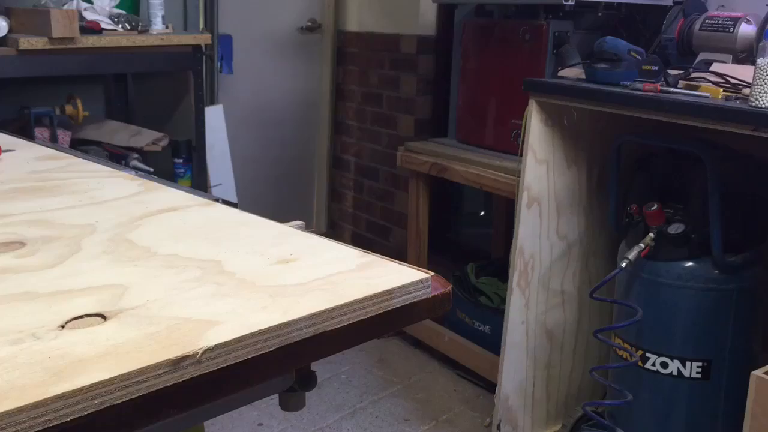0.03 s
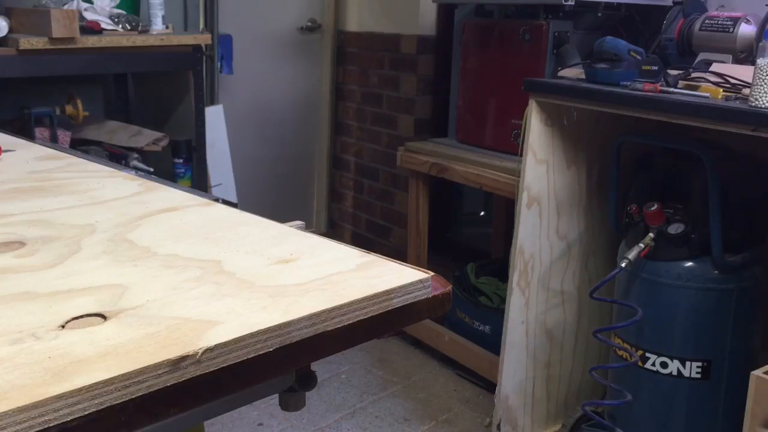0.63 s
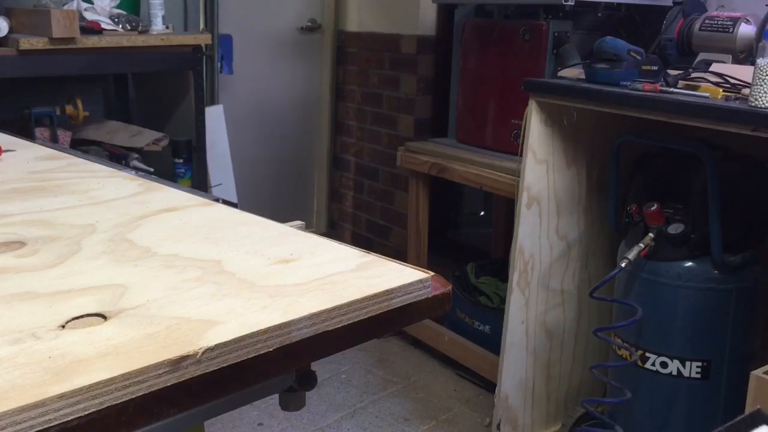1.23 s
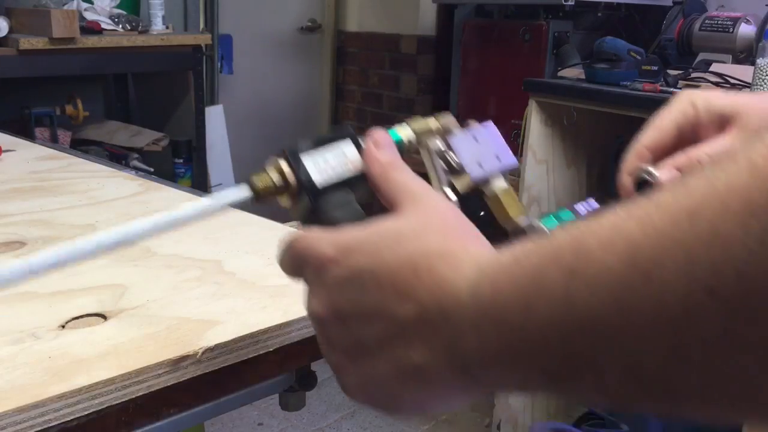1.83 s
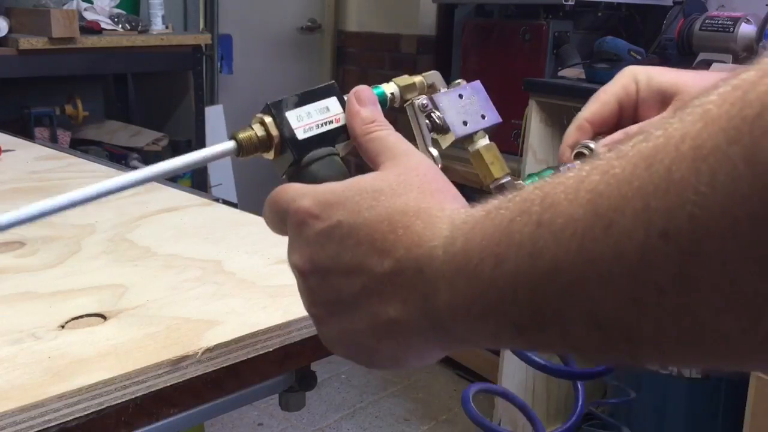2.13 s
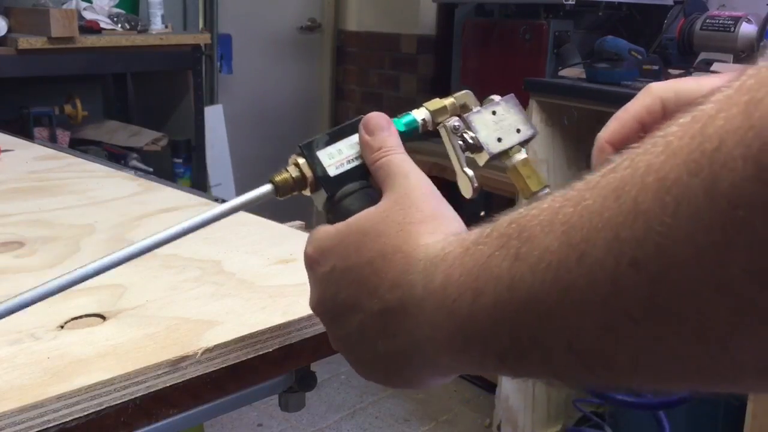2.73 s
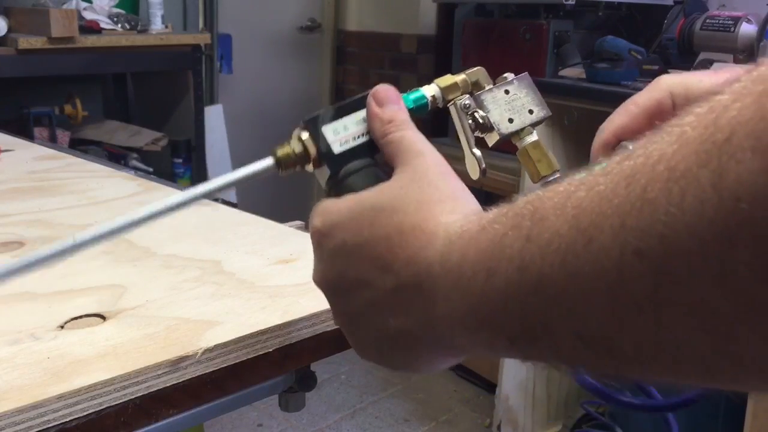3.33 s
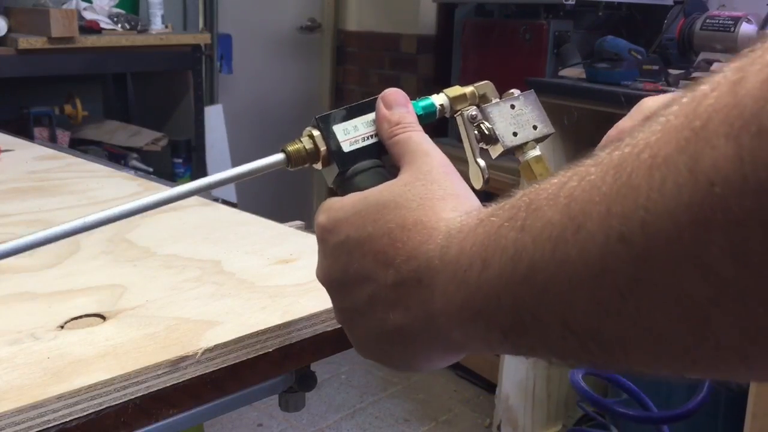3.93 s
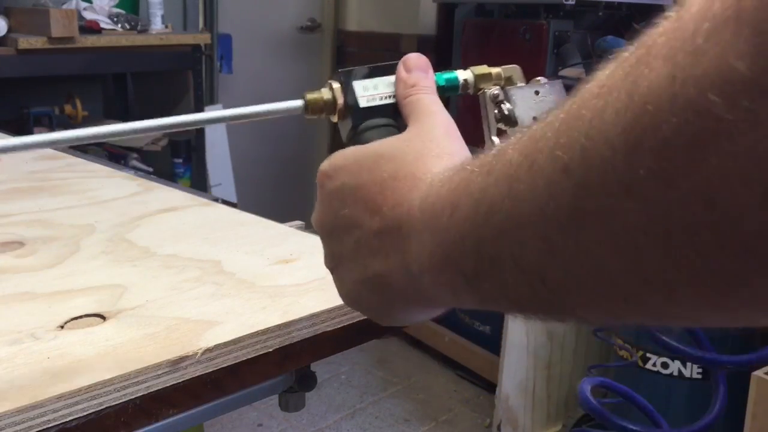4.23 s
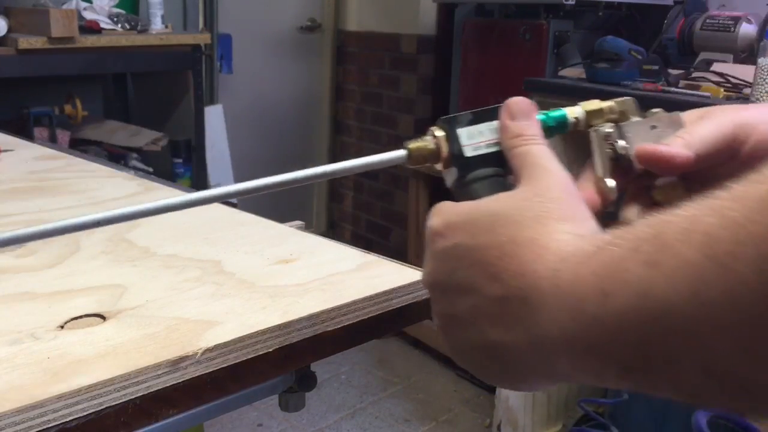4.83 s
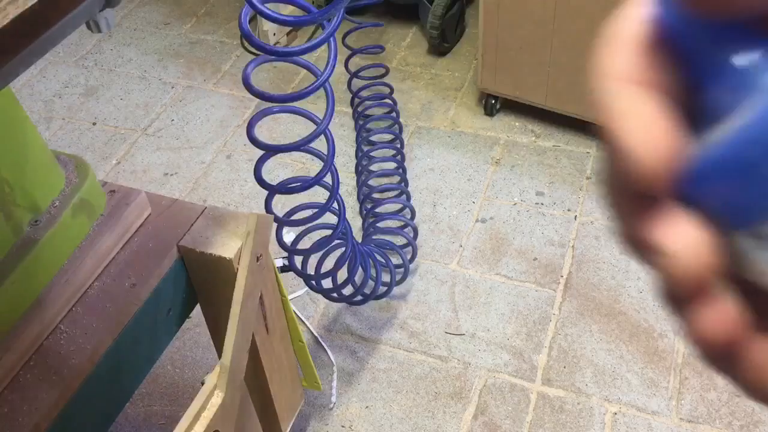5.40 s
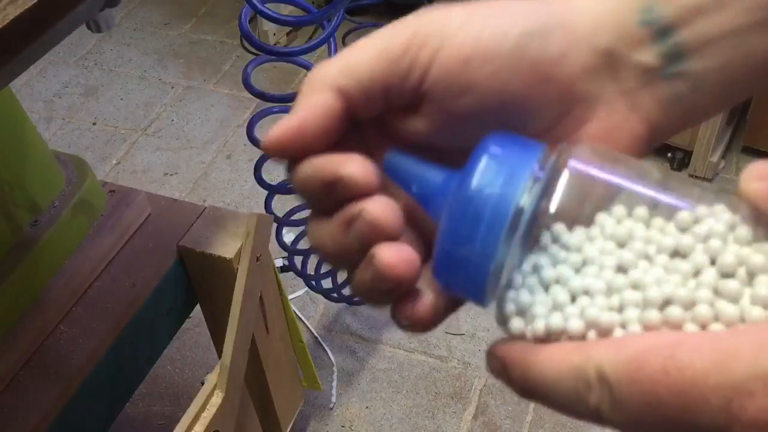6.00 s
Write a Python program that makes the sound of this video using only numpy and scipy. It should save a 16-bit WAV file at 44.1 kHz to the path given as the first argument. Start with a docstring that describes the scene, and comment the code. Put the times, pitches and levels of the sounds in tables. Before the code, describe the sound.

Light clunks and metal clicks lead to a sharp burst of compressed air with ringing metal, followed by pellets rattling in a plastic bottle.

```python
"""Air gun and pellet bottle

An air gun is handled in a small workshop: its hollow body knocks, its brass fittings click, then the hose
coupling lets go with a short blast of compressed air and a clack, and nearby metal rings on. Close by, a
plastic bottle of pellets is picked up and tilted, so that the pellets slide and knock against its wall.
Under it all lie a low rumble, a hum and the hiss of the room."""
import sys
import numpy as np
from scipy import signal
from scipy.fft import rfft, irfft
from scipy.io import wavfile
from scipy.ndimage import uniform_filter1d

SR = 44100
rng = np.random.default_rng(int(sys.argv[2]) if len(sys.argv) > 2 else 0)


def to_wav(s):
    """Save 16-bit WAV."""
    ch = np.atleast_2d(s).T  # columns
    pcm = np.round(np.clip(ch, -1, 1) * 32767)  # PCM
    wavfile.write(sys.argv[1], SR, pcm.astype(np.int16))


N = 271656
TIME = np.arange(N) / SR

# Envelope of the air leaving the coupling: time_s, jet_db, roar_db
BLAST_ENVELOPE = [(3.89, -85.5, -82), (3.91, -51.5, -59.5), (3.933, -24.5, -31), (3.96, -21, -30.5),
                  (3.995, -15, -24), (4.015, -17.5, -27), (4.05, -30, -36), (4.1, -45, -58.5)]
# Tone of the thin jet and of the emptying hose's roar: freq_hz, gain_db
JET_EQ = [(5000, -41.5), (7400, -22.5), (8100, -6), (8700, -8), (9700, -2), (10400, -9.5), (11500, -4),
          (12700, -1), (15300, -4)]
ROAR_EQ = [(40, -14.5), (100, -17), (240, -4.5), (380, -5.5), (500, -8), (880, -2), (1300, -4.5), (2200, 5),
           (2900, -1), (4800, 0.5), (7000, -3), (10000, -20.5)]
# Early reflections off nearby surfaces: delay_ms, gain_db
ECHOES = [(1.7, -18), (4.3, -17), (7.1, -17.5), (11.9, -14.5), (14.6, -16.5)]
def air_blast():
    """Turbulent air escapes as the coupling opens; close echoes comb it."""
    jet = gain_of(-2) * noise(JET_EQ) * envelope(BLAST_ENVELOPE, column=1)
    roar = gain_of(-3) * noise(ROAR_EQ) * envelope(BLAST_ENVELOPE, column=2)
    air = (jet + roar) * flutter(depth_db=1.13, samples=200)
    out = air.copy()
    for delay_ms, db in ECHOES:
        add(out, delay_ms / 1000, gain_of(db) * air)
    return out


# Tone of the shaken tools and shelves: freq_hz, gain_db
SHIMMER_EQ = [(900, -25), (1900, -8), (2900, -2.5), (3700, -2.5), (4500, -3), (5200, -4.5), (5900, -1),
              (7000, -5.5), (8200, -11.5), (12000, -23)]
# Steel parts that sing on: pitch_hz, level_db, t60_s
STEEL_MODES = [(1970, -19.5, 1.5), (2230, -12, .8), (2460, -10, 0.88), (2756, -12, .75), (2810, -4.5, .75),
               (3047, -12.5, 0.33), (4250, -0.5, .5), (4600, -3, 0.76), (4560, -2.5, .55),
               (5700, -10.5, .45)]
def ringing_metal(shimmer_t60_s=0.62):
    """At its peak the blast sets nearby metal ringing: a few clear modes in a dense shimmer."""
    out, t = np.zeros(N), np.arange(SR) / SR
    shimmer = noise(SHIMMER_EQ)[:SR] * gain_of(-39 - 60 * t / shimmer_t60_s)
    peak_s = max(BLAST_ENVELOPE, key=lambda row: row[1])[0]
    add(out, peak_s, shimmer + gain_of(-48) * ringing(STEEL_MODES, t))
    return out


# Collar, latch and plug: start_s, level_db, brightness_db, pitch_hz, extra_bass_db, decay_factor
COUPLING_CLICKS = [(2.1973, -55, -11, 5600, 2, 4.7), (2.5497, -53.5, 3, 7440, 7, 2.6),
                   (2.5538, -54.5, 4, 4400, 4, 3.1), (2.7115, -43, -4, 2370, -7, 5),
                   (2.7158, -31, 1, 8100, -4.5, 1.7), (2.7184, -37, 0.5, 4340, 1.5, 2),
                   (3.4575, -47.5, 2, 2350, 11, 1.8), (3.4595, -43, -3, 6430, 15, 1.4),
                   (3.4942, -50.5, -4, 3580, 8, .8), (3.5161, -37.5, 12.5, 11800, 14, 0.44),
                   (3.5206, -47, -10, 2550, -6, .7), (3.7006, -44.5, -6.5, 2540, -16, 2.6),
                   (3.7054, -52, -7, 2720, 4, 1.1), (4.1043, -27, 0.5, 4250, -3, 2.2),
                   (4.117, -42, 10.5, 3120, 8, 0.87)]
# Attack of a hit on brass: bass_db, treble_db, top_db, base_decay_ms
BRASS_ATTACK = (-0.5, -0.5, -6, 0.62)
# Ring of the brass: pitch_hz, level_db, t60_s
BRASS_MODES = [(2120, 0, 0.1), (2170, -15, 0.1), (2480, 4.5, .11), (2480, -2.5, 0.12), (2823, -7, 0.076),
               (4270, 3, 0.1), (5300, -3, 0.12), (7160, -6, 0.066), (8800, 6, .06), (12500, 7, 0.086),
               (14390, -10, .05)]
# Small fittings radiate little bass: freq_hz, gain_db
BRASS_EQ = [(300, -3), (800, -5.5), (1300, -7), (2100, 2), (3200, 0.5), (8000, -1.5), (11000, -2.5),
            (15000, 4)]
def hose_coupling():
    """The coupling's parts snap against each other and ring the brass."""
    clicks = strikes(COUPLING_CLICKS, BRASS_ATTACK, BRASS_MODES, ring_db=-13, deep_db=-19, tick_db=-2)
    return gain_of(-1.5) * coloured(clicks, BRASS_EQ)


# Knocks on the gun: start_s, level_db, brightness_db, pitch_hz
GUN_KNOCKS = [(0.6967, -62.5, 2, 1430), (0.7742, -49.5, -7, 3600), (0.8154, -55, -7, 3820),
              (0.8442, -55, -2, 4300), (0.8522, -43, -3, 4520), (0.8863, -47, 1, 2140),
              (0.8956, -38.5, 5, 6100), (0.9035, -36.5, 12, 6500), (0.9217, -44.5, -7, 3370),
              (0.93, -35, 16, 7100), (0.9345, -39, -9, 2110), (1.4167, -52, -12, 1630),
              (1.4694, -48, -25, 3370), (1.712, -58.5, 6, 5270)]
# Attack of a hit on the gun: bass_db, treble_db, top_db, base_decay_ms
GUN_ATTACK = (-5.5, -7, -15, 3)
# Hollow ring of its body: pitch_hz, level_db, t60_s
GUN_MODES = [(724, -8.5, 0.077), (1028, 0, 0.064), (1141, 7, 0.1), (1580, -9, 0.034), (2050, 0, 0.082),
             (2140, -3, 0.22), (2500, -3, 0.092), (3370, 13, 0.018), (4130, 2.5, 0.066), (6800, -20, 0.067),
             (8000, -21, .12)]
def gun_knocks():
    """The gun's hollow body knocks and rings as it is lifted."""
    return gain_of(-2) * strikes(GUN_KNOCKS, GUN_ATTACK, GUN_MODES, ring_db=-7.5, deep_db=-30, tick_db=-4)


# Envelope of the drag: time_s, level_db
DRAG_ENVELOPE = [(.74, -79), (.78, -59), (.81, -75), (.84, -53), (.88, -59), (.93, -65.5), (.97, -65),
                 (1.03, -84)]
# Tone of the scrape: freq_hz, gain_db
SCRAPE_EQ = [(400, -40), (1000, -1), (3000, -5), (4400, -1.5), (5200, -17), (8000, -5), (10500, -25),
             (14000, -9)]
def gun_drag():
    """As the gun is picked up, small slips scrape it and sound its hollow body."""
    slips = flutter(depth_db=3, samples=50)
    scrape = unit_rms(noise(SCRAPE_EQ) * slips)
    ring = ringing(GUN_MODES, np.arange(SR // 8) / SR)
    body = unit_rms(signal.oaconvolve(scrape, ring)[:N])
    return gain_of(-2.5) * unit_rms(scrape + gain_of(-7) * body) * envelope(DRAG_ENVELOPE)


# Hits on the bottle wall: start_s, level_db, brightness_db, pitch_hz
PELLET_KNOCKS = [(5.2036, -63, -5, 2910), (5.291, -46, 0, 1260), (5.296, -52, 8, 3270),
                 (5.3273, -56, 5, 3640), (5.3322, -48, -23, 3600), (5.3432, -48.5, -13, 2900),
                 (5.3809, -39, -22, 2720), (5.3877, -41, -15.5, 3120), (5.3906, -35.5, -4, 3040),
                 (5.4826, -33.5, 4, 3870), (5.491, -34, -9, 4020), (5.5042, -35.5, 2, 4100),
                 (5.516, -36, -5, 3190), (5.5217, -35.5, 0, 4500), (5.6514, -31, 12, 6740),
                 (5.6602, -33.5, 3, 5560), (5.6745, -34, 5, 3680), (5.6788, -30.5, -24, 3370),
                 (5.7219, -33.5, -7, 3470), (5.732, -36, 15, 7300), (5.743, -34.5, -3, 3600),
                 (5.7834, -31, -7, 3900), (5.8193, -39.5, 3, 3500), (5.8594, -38, -2, 2230),
                 (5.8912, -30.5, 10, 2140), (5.9056, -52, 1, 1890), (5.925, -48, -9, 1870),
                 (5.9367, -55, 7, 5590), (6.0602, -53, -4, 5640), (6.0787, -56, 3, 6090),
                 (6.0918, -54, -11, 2320), (6.1101, -44, -7, 4320), (6.1196, -45.5, 7, 6750),
                 (6.1487, -41, 2.5, 1940)]
# Attack of a pellet: bass_db, treble_db, top_db, base_decay_ms
PELLET_ATTACK = (-17, 2, -13, 2.1)
# Short ring of the plastic: pitch_hz, level_db, t60_s
BOTTLE_MODES = [(1000, -16, 0.059), (2100, -0.5, 0.011), (2240, 5, 0.013), (3000, 7.5, 0.011),
                (3080, 2, 0.011), (3504, 5, 0.023), (3730, -2.5, 0.018), (4300, -13, 0.031),
                (6170, 4.5, 0.01), (6840, 2, 0.0078)]
def pellet_knocks():
    """Single pellets strike the wall and ring the bottle."""
    knocks = strikes(PELLET_KNOCKS, PELLET_ATTACK, BOTTLE_MODES, ring_db=-10, deep_db=-59, tick_db=-2)
    return gain_of(-0.5) * knocks


# The heap shifts, pours, settles and starts back: time_s, level_db
SLIDE_ENVELOPE = [(5.275, -71.5), (5.298, -52.5), (5.355, -54), (5.39, -53), (5.45, -53.5), (5.57, -39),
                  (5.625, -42.5), (5.67, -39.5), (5.77, -40.5), (5.87, -57), (5.95, -71), (6.0, -59.5),
                  (6.06, -69.5), (6.135, -50), (6.16, -56)]
# Tone of the pellets in their bottle: freq_hz, gain_db
PELLET_EQ = [(180, -82), (300, -46.5), (756, -41), (922, -12.5), (1370, -4), (2170, -4.5), (2480, -8),
             (3570, -4), (4280, -2.5), (6900, -7), (10600, -15), (14300, -12.5), (15500, -23)]
def pellet_slide(tick_decay_s=0.00036, spots=24):
    """Pellets collide more often the faster they slide; each tick also rings the bottle."""
    out, t = np.zeros(N), np.arange(SR // 30) / SR
    start_s = SLIDE_ENVELOPE[0][0]
    slide = envelope(SLIDE_ENVELOPE)[round(start_s * SR):]
    hits_per_s = 450 + 1400 * slide / slide.max()
    collides = rng.random(N)[-len(slide):] < hits_per_s / SR
    hardness = rng.exponential(1, N)[-len(slide):]  # many small collisions, a few hard ones
    spot = rng.integers(0, spots, N)[-len(slide):]  # each place in the bottle has its own tick
    strength = unit_rms(gain_of(1.5 * np.minimum(hardness, 3)))
    hits = strength * collides * np.sqrt(SR / hits_per_s) * slide
    for k in range(spots):
        burst = rng.standard_normal(len(t)) * np.exp(-t / tick_decay_s)
        tick = unit_energy(coloured(burst, PELLET_EQ))
        wall = gain_of(-2) * unit_energy(ringing(BOTTLE_MODES, t))
        add(out, start_s, signal.fftconvolve(hits * (spot == k), unit_energy(tick + wall)))
    return out


# The hand damps the bottle's low ring: freq_hz, gain_db
GRIP_EQ = [(300, -11), (900, -5.5), (1500, -5.5), (2600, 2.5), (3500, 0), (6000, 1.5), (14000, 0.5)]
# The small bottle radiates little bass: freq_hz, gain_db
BOTTLE_EQ = [(250, -16.5), (600, -12.5), (900, -1.5), (1400, 0), (9000, 0), (15000, -3.5)]
def held_bottle(pellets, loosen_at_s=5.49, loosen_over_s=0.18):
    """The bottle sounds thin while it is gripped and fills out as the hand loosens."""
    loose = np.clip((TIME - loosen_at_s) / loosen_over_s, 0, 1)
    gripped = coloured(pellets, GRIP_EQ)
    return coloured(loose * pellets + (1 - loose) * gripped, BOTTLE_EQ)


# Strokes of the hand: start_s, length_s, level_db, centre_hz, width_hz
RUBS = [(1.055, 0.083, -66.5, 3110, 200), (1.06, 0.058, -72, 610, 300), (1.465, 0.027, -66, 3300, 1280),
        (2.1, 0.24, -68, 3120, 265), (2.17, 0.11, -70.5, 4540, 2500), (2.555, 0.074, -66, 2050, 700),
        (2.95, 0.086, -82, 1390, 1200), (3.705, 0.075, -70, 2940, 1090), (5.17, 0.1, -74.5, 2100, 1178)]
def hand_rubs():
    """Hands rub on hose and fittings with a grainy friction."""
    return swishes(RUBS, grain_db=2.5)


# Wisps of air: start_s, length_s, level_db, centre_hz, width_hz
WISPS = [(1.215, 0.078, -75, 12100, 2200), (2.19, 0.05, -70, 13000, 3000), (2.54, 0.04, -65, 13700, 2960),
         (3.517, 0.062, -60, 12100, 1100)]
def air_leaks():
    """Air leaks at the coupling in smooth, high wisps."""
    return swishes(WISPS, grain_db=1)


# Low thuds: start_s, level_db, pitch_hz
BUMPS = [(0.437, -57, 197), (0.525, -51, 164), (0.578, -52, 228), (1.079, -58, 227), (1.089, -56, 73.5),
         (2.157, -45.5, 125), (2.217, -48.5, 113), (2.299, -53.5, 317), (2.428, -55, 329),
         (2.599, -51.5, 101), (4.42, -48.5, 65), (4.5, -50.5, 64.8), (5.295, -49.5, 153)]
def handling_bumps(rise_s=0.013):
    """Handling makes dull, soft-edged bumps that swell and fade."""
    out, t = np.zeros(N), np.arange(SR // 4) / SR
    swell = t / rise_s * np.exp(1 - t / rise_s)
    for start_s, db, hz in BUMPS:
        add(out, start_s, gain_of(db - 5) * swell * np.sin(2 * np.pi * (hz * t + rng.random())))
    return out


# Decay of the room: freq_hz, t60_s
ROOM_DECAY = [(150, 0.054), (700, 0.38), (2500, 0.26), (5000, 0.26), (9000, 0.24), (14000, 0.063)]
def workshop_reverb(send, predelay_s=0.003, density=1 / 6):
    """Dense reflections from bench, floor and shelves; each band dies at its own speed."""
    size = SR * 3 // 4
    reflections = rng.standard_normal(size) * (rng.random(size) < density)
    reflections *= np.arange(size) / SR > predelay_s
    hz, t, bands = signal.stft(reflections, SR, nperseg=256)
    decay = gain_of(-60 * t / value_at(ROOM_DECAY, hz)[:, None])
    tail = signal.istft(bands * decay, SR, nperseg=256)[1]
    return signal.oaconvolve(send, unit_energy(tail))[:N]


# Envelope of the rumble's two layers: time_s, deep_db, upper_db
RUMBLE_ENVELOPE = [(0.08, -76, -64), (0.11, -71, -66.5), (0.69, -67, -66), (0.86, -73, -73.5),
                   (1.97, -69, -70), (2.23, -65, -61.5), (2.64, -66.5, -68.5), (3.36, -74.5, -72),
                   (3.87, -69, -72), (3.94, -75, -64), (4.02, -56.5, -46.5), (4.14, -78, -76.5),
                   (4.53, -70, -70), (4.7, -72, -70.5), (4.92, -67.5, -73.5), (5.18, -62, -72),
                   (5.65, -70, -74.5), (6.16, -67, -68.5)]
# Tone of each layer: freq_hz, gain_db
DEEP_EQ = [(20, -28.5), (40, -13), (62, 5.5), (80, 5), (105, -10.5), (200, -41.5)]
UPPER_EQ = [(59, -28.5), (100, -5), (123, -3), (184, -4), (216, -1), (259, -11.5), (324, -6.5),
            (416, -24.5), (578, -29.5), (600, -33.5), (780, -63.5), (1320, -120)]
def rumble():
    """A low rumble rises and sinks with the handling and surges with the air blast."""
    deep = gain_of(-1) * noise(DEEP_EQ) * envelope(RUMBLE_ENVELOPE, column=1)
    upper = gain_of(-1.5) * noise(UPPER_EQ) * envelope(RUMBLE_ENVELOPE, column=2)
    return deep + upper


# Envelope of the hum: time_s, level_db
HUM_ENVELOPE = [(4.9, -68), (5.13, -59.5), (5.28, -55.5), (5.5, -61.5), (6.16, -60.5)]
def hum(pitch_hz=63.5, waver_hz=1.23):
    """A wavering hum near the bottle swells, then settles."""
    hz = pitch_hz + waver_hz * wander(samples=8000)
    swell = gain_of(-1) * envelope(HUM_ENVELOPE) * flutter(depth_db=1, samples=7000)
    return swell * unit_rms(np.sin(2 * np.pi * np.cumsum(hz) / SR))


# Tone of the room's hiss: freq_hz, gain_db
HISS_EQ = [(240, -29), (400, -2), (419, -6), (633, -7.5), (715, -7.5), (1690, -10.5), (1910, -10),
           (2090, -9.5), (3910, -13), (15500, -23)]
def room_hiss():
    """A faint, steady hiss fills the room."""
    return gain_of(-78.5) * noise(HISS_EQ)


# Centres of a contact's bass, mids, treble and top: freq_hz
BANDS_HZ = [1050, 2700, 6600, 12200]
def impact(attack, deep_db, tick_db, level_db, bright_db, pitch_hz, extra_bass_db=0, decay_factor=1):
    """A hard contact: a noisy crack and a pitched tick that die within milliseconds."""
    bass, treble, top, base_decay_ms = attack  # band gains are relative to the mids
    bass, treble, top = bass + extra_bass_db, treble + 0.77 * bright_db, top + bright_db
    # Harder contacts are shorter: the decay time halves for every 26 dB above a medium hit.
    decay_ms = base_decay_ms * decay_factor * 2 ** ((-45 - level_db) / 26)
    t = np.arange(SR // 9) / SR
    fade = np.exp(-t * 1000 / max(decay_ms, 0.1))
    eq = [(200, bass + deep_db), (600, bass - 10), *zip(BANDS_HZ, [bass, 0, treble, top]),
          (17000, top - 7)]
    crack = unit_energy(coloured(rng.standard_normal(len(t)) * fade, eq))
    tick = gain_of(tick_db) * unit_energy(np.sin(2 * np.pi * pitch_hz * t) * fade)
    return gain_of(level_db) * unit_energy(crack + tick) * np.sqrt(0.0034 * SR)  # rms over 3.4 ms


def strikes(rows, attack, modes, ring_db, deep_db, tick_db):
    """Each contact also sets the modes of the struck object ringing."""
    out, t = np.zeros(N), np.arange(SR // 4) / SR
    for start_s, *blow in rows:
        contact = impact(attack, deep_db, tick_db, *blow)
        ring = gain_of(ring_db) * np.linalg.norm(contact) * unit_energy(ringing(modes, t))
        add(out, start_s, contact)
        add(out, start_s, ring)
    return out


def ringing(modes, t):
    """Sum of dying modes, each struck with its own random strength."""
    hz, db, t60 = np.transpose(modes)[:, :, None]
    strength = rng.uniform(0.7, 1.3, hz.shape) * rng.choice([-1, 1], hz.shape)
    return (strength * gain_of(db - 60 * t / t60) * np.sin(2 * np.pi * hz * t)).sum(0)


def swishes(rows, grain_db):
    """Short swells of grainy noise in one resonance: quick to rise, slower to fade."""
    out = np.zeros(N)
    for start_s, length_s, db, centre_hz, width_hz in rows:
        size = max(round(length_s * SR), 200)
        grains = gain_of(grain_db * wander(samples=70, length=size)) * rng.standard_normal(size)
        detune = (np.fft.rfftfreq(size, 1 / SR) - centre_hz) / (width_hz / 2)
        band = irfft(rfft(grains) / (1 + detune ** 2) ** 0.63, size)
        swell = np.sin(np.pi * np.sqrt(np.linspace(0, 1, size)))
        add(out, start_s, gain_of(db) * unit_rms(band) * swell)
    return out


def coloured(x, eq):
    """Causal filter with the given spectrum, so attacks stay sharp."""
    log_gain = np.log(gain_of(value_at(eq, abs(np.fft.fftfreq(2048, 1 / SR)))))
    minimum_phase = np.exp(np.conj(signal.hilbert(log_gain)))
    taps = np.fft.ifft(minimum_phase).real
    return signal.fftconvolve(x, taps[:len(taps) // 2])[:len(x)]


def noise(eq):
    """Steady noise of rms 1 with the given spectrum."""
    return unit_rms(coloured(rng.standard_normal(N), eq))


def wander(samples, length=N):
    """Random drift of rms 1, smoothed over the given samples."""
    return unit_rms(uniform_filter1d(rng.standard_normal(length), samples))


def flutter(depth_db, samples):
    """A gain that swells and sinks at random."""
    return gain_of(depth_db * wander(samples))


def envelope(rows, column=1):
    """Amplitude over time from one dB column of a curve; silent outside it."""
    rows = np.asarray(rows)
    return gain_of(np.interp(TIME, rows[:, 0], rows[:, column], left=-140, right=-140))


def value_at(curve, hz):
    """Reads a curve on a log-frequency axis."""
    freqs, values = np.transpose(curve)
    return np.interp(np.log(hz + 1), np.log(freqs + 1), values)


def add(mix, start_s, sound):
    """Mixes a sound in at its start time."""
    part = mix[max(round(start_s * SR), 0):][:len(sound)]
    part += sound[:len(part)]


def gain_of(db):
    """Decibels to amplitude."""
    return 10 ** (np.asarray(db) / 20)


def unit_rms(x):
    """Scales to rms 1."""
    return x / np.sqrt(np.mean(x ** 2) + 1e-20)


def unit_energy(x):
    """Scales to energy 1."""
    return x / np.linalg.norm(x)


def scene():
    """The gun is at arm's length; the bottle is closer and drier."""
    gun = gun_knocks() + hose_coupling()
    knocks = pellet_knocks()
    gun += gun_drag() + hand_rubs() + air_leaks()
    air = air_blast()
    bottle = held_bottle(knocks + pellet_slide())
    room = workshop_reverb(gain_of(-7.5) * gun + gain_of(-10) * air + gain_of(-14.5) * bottle)
    foreground = gun + air + ringing_metal() + bottle + handling_bumps()
    return (foreground + room + rumble() + hum() + room_hiss())[None]


def record(dry, silence_s=0.072, fade_s=0.01, cutoff_hz=15450):
    """The sound opens after a moment of silence, with its highest treble cut off."""
    fade_in = np.clip((TIME - silence_s) / fade_s, 0, 1)
    low_pass = signal.firwin(601, cutoff_hz, window=("kaiser", 9), fs=SR)
    return signal.oaconvolve(dry * fade_in, low_pass[None], "same")


dry = scene()
out = record(dry)
to_wav(out)
```